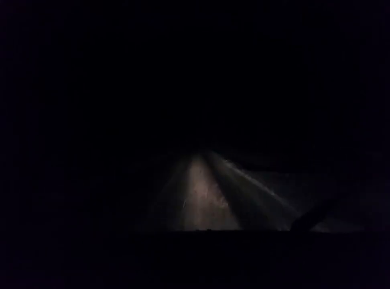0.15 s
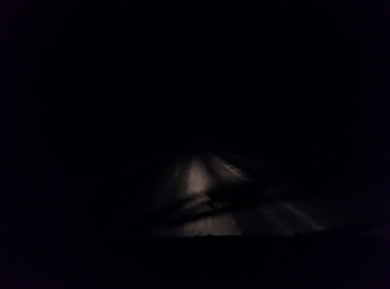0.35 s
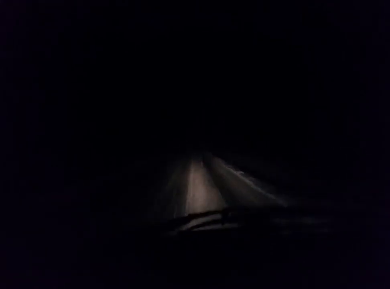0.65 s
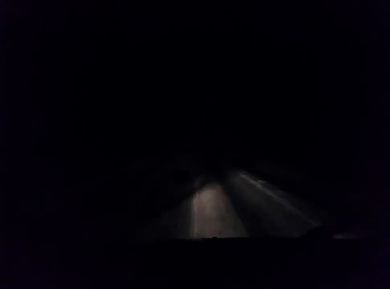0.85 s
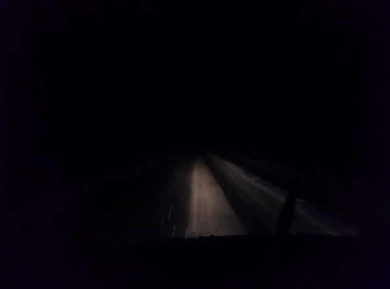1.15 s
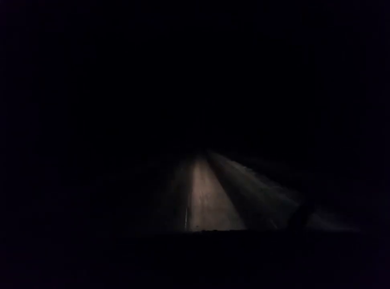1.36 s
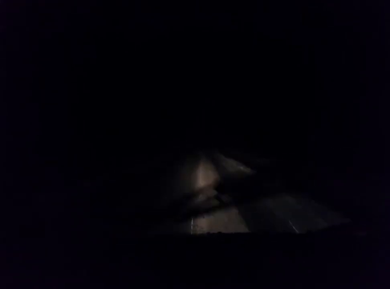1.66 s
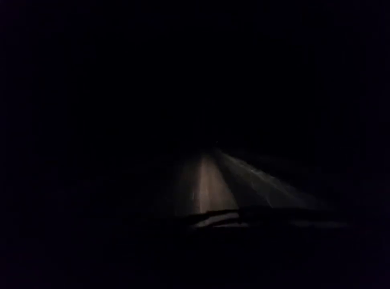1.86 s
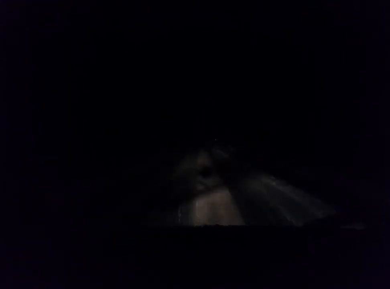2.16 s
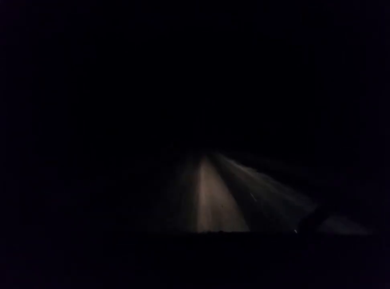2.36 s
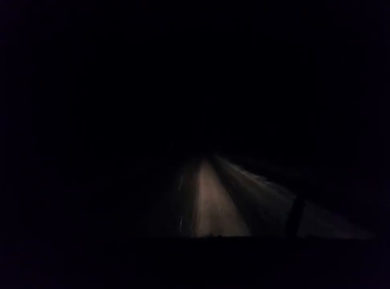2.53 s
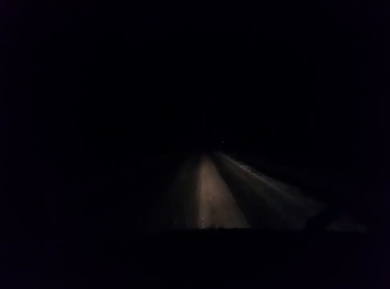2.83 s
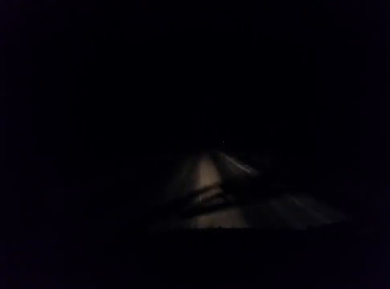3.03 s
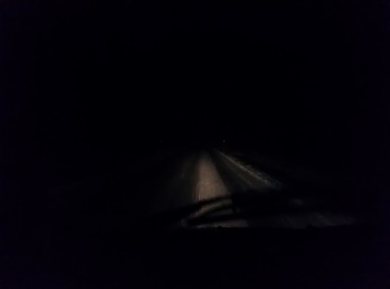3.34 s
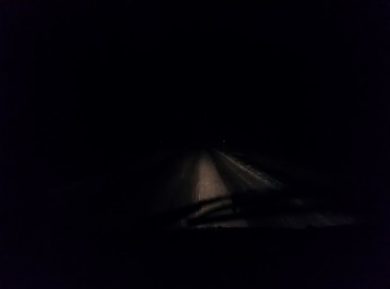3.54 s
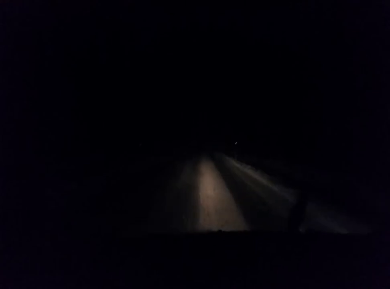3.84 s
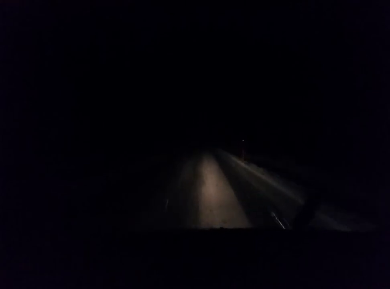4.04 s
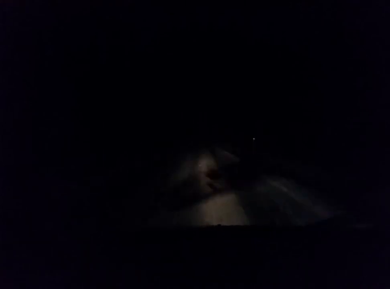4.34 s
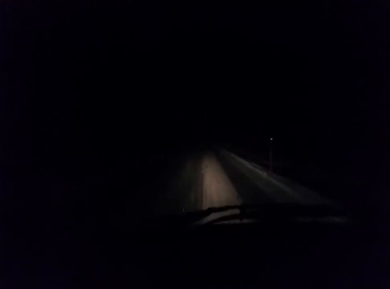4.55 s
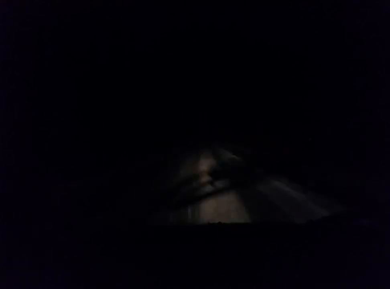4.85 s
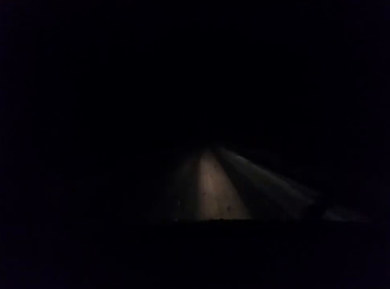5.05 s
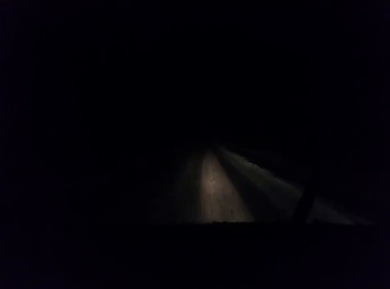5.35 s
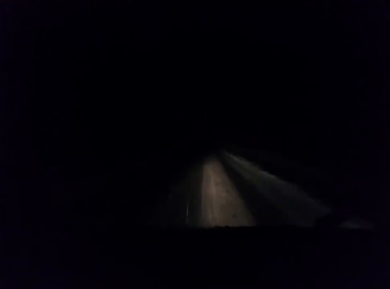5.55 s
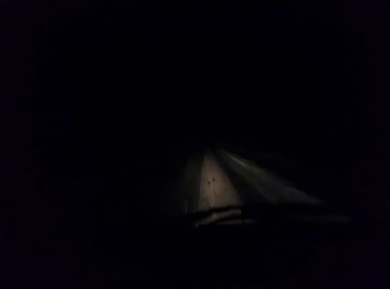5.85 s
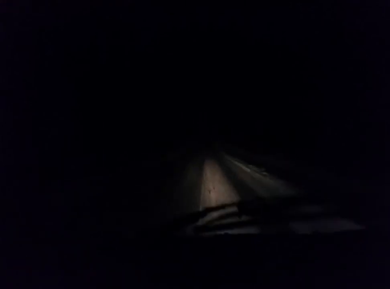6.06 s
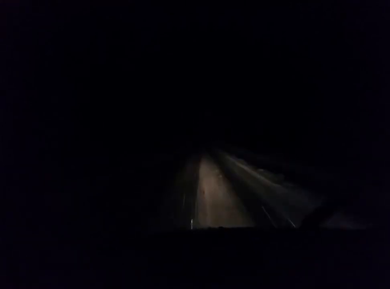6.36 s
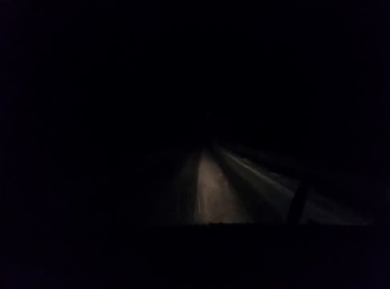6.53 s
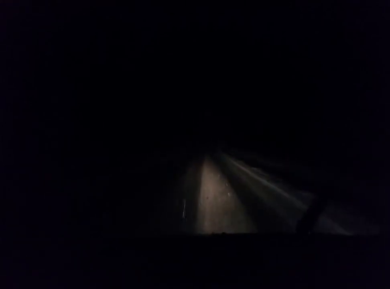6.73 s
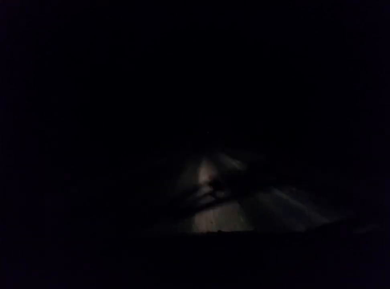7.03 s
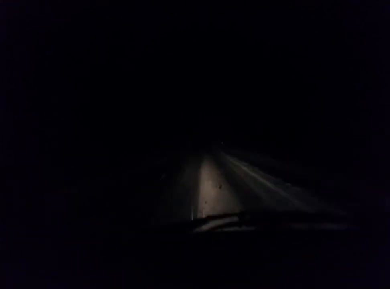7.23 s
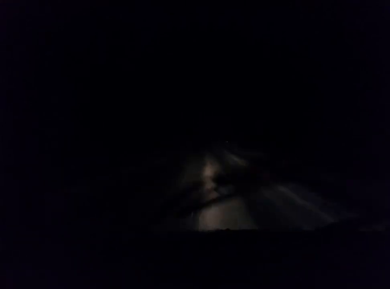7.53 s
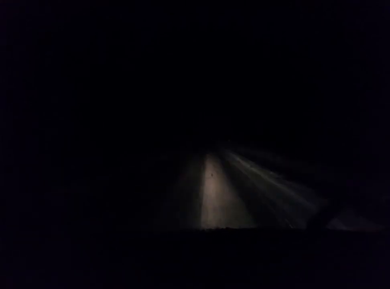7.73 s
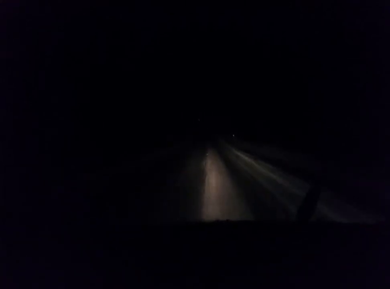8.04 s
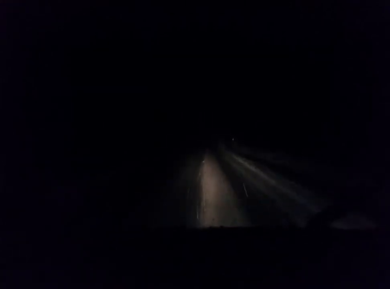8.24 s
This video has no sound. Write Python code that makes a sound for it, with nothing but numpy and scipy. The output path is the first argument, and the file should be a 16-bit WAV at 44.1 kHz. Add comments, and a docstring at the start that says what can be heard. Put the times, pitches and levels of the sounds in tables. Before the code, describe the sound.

Inside a moving car at night, heard close to the windscreen: a steady low engine hum, deep uneven body boom and muffled tyre roar on slush, with faint vent hiss. About every 1.35 seconds a wiper blade flips with a sharp snap and arm knock, usually followed by a short wet, juddering drag and low rubbery moan. An extra weaker flip comes near the end.

```python
"""Inside a car at steady speed on a slushy road, heard by a phone held near the windscreen.
From the start the engine hums (sines), the road booms and roars and the vents hiss (shaped noise).
About every 1.35 s, first at 0.04 s, a wiper blade flips: a snap, a knock of the arm, a wet tail.
After most flips it drags over the wet glass: uneven puffs of noise and single slips with spray.
Meanwhile glass and arm moan or squeak in wavering tones; a last extra flip comes near the end."""
import sys
import numpy as np
from scipy import signal
from scipy.fft import rfft, irfft, next_fast_len
from scipy.io import wavfile
from scipy.ndimage import uniform_filter1d

SR = 44100
rng = np.random.default_rng(int(sys.argv[2]) if len(sys.argv) > 2 else 0)


def to_wav(s):
    """Save 16-bit WAV."""
    ch = np.atleast_2d(s).T  # columns
    pcm = np.round(np.clip(ch, -1, 1) * 32767)  # PCM
    wavfile.write(sys.argv[1], SR, pcm.astype(np.int16))


N = 369999
T = np.arange(N) / SR  # time of every sample, s

# the blade drags over the glass: start t/s, length t/s, level/dB, level change to the end/dB,
# extra rumble/dB, extra brightness/dB
DRAGS = [(0.18, 0.35, -28.5, -1.5, 9.5, -1), (1.631, 0.14, -25.5, -10.5, -2, 0),
         (1.769, 0.12, -29, -2.5, 8.5, -5), (2.858, 0.15, -26.5, -9.5, 8.5, -12),
         (2.971, 0.18, -28, -6.5, 3.5, -7), (3.115, 0.18, -32, -8.5, 8.5, 2),
         (4.178, 0.19, -32.5, -2, 14, 3.5), (4.406, .15, -33.5, -1, -2, -7),
         (5.634, 0.1, -26.5, -10, -12, 3), (5.714, 0.24, -27, -8, 6, 3.5), (6.895, 0.22, -33, 5.5, 7.5, 0),
         (7.07, 0.21, -30, -1, 8.5, -1.5), (8.183, .3, -32.5, -3.5, 8, -2)]


def amp(db):
    """Turn dB into a gain."""
    return 10 ** (np.asarray(db) / 20)


def on_log(table, hz):
    """Read a table of f/Hz and value, with frequency on a log axis."""
    f, v = np.transpose(table)
    return np.interp(np.log(hz + 1), np.log(f), v)


def columns(table, outside=None):
    """Draw straight lines between table rows; give each column at every sample."""
    s, *cols = np.transpose(table)
    return [np.interp(T, s, c, outside, outside) for c in cols]


def walk(rate):
    """Wander at random: levels held 1 / rate s, smoothed twice; spread near 1."""
    k = int(SR / rate)
    held = np.repeat(rng.standard_normal(N // k + 1), k)
    return 1.247 * uniform_filter1d(uniform_filter1d(held, k), k)[:N]


def flicker(depth_db, rate, count):
    """Make unrelated level walks in dB, one for each band."""
    return [depth_db * walk(rate) for _ in range(count)]


def noise():
    """Make two unrelated white noises."""
    return rng.standard_normal((2, N))


def band(x, hz, width):
    """Ring like one resonance (two poles), with gain 1 at its centre."""
    return signal.lfilter(*signal.iirpeak(min(hz, .45 * SR), hz / width, SR), x)


def burst(s, t60):
    """Jump up at s and die away, losing 60 dB in t60 seconds."""
    out, first = np.zeros(N), int(s * SR)
    fading = T[:min(int(2 * t60 * SR), N - first)]
    out[first:first + len(fading)] = np.exp(-np.log(1000) * fading / t60)
    return out


def sweep(start, length):
    """Give the progress 0-1 through a drag and its envelope: grip, hold, let go."""
    grip_s, let_go_s = 0.032, 0.03
    rise = np.clip((T - start) / grip_s, 0, 1)
    fall = np.clip((start + length - T) / let_go_s, 0, 1)
    along = np.clip((T - start) / length, 0, 1)
    return along, np.sin(np.pi / 2 * rise * fall) ** 2


def cabin(source, shape, bands_db):
    """Colour two unrelated signals, spread them over both ports, move the gain of each band."""
    # how alike the ports sound: f/Hz, left-right correlation
    likeness = [(25, 0.999), (60, 0.96), (200, 0.97), (360, 0.64), (470, 0.88), (560, 0.79), (700, 0.8),
                (950, 0.3), (1600, -0.2), (2100, 0.5), (2700, 0.1), (3200, -0.05), (14000, .05)]
    # each port has its own treble resonance: f/Hz, left minus right level/dB
    port_lean = [(30, -1.5), (60, -.5), (170, 3), (400, -0.5), (800, 2.5), (1350, -2.5), (2100, 2.5),
                 (3800, 2), (4900, -2.5), (5500, -12.5), (6700, -18), (7800, 15.5), (9400, 17.5),
                 (11500, 0), (14000, -4.5)]
    size = next_fast_len(N)
    hz = np.arange(size // 2 + 1) * SR / size
    alike = np.clip(on_log(likeness, hz), -1, 1)
    mid, side = rfft(source, size) * [np.sqrt(1 + alike), np.sqrt(1 - alike)]
    lean = amp(on_log(port_lean, hz) / 2)
    # leaning moves sound between the ports and keeps their mean
    mean = np.sqrt(lean ** 2 + lean ** -2 + 2 * alike)
    ports = np.array([(mid + side) * lean, (mid - side) / lean])
    both = amp(on_log(shape, hz)) * ports / mean
    # bring the average of the ports to RMS 1 before the band gains
    both = both / np.sqrt(np.mean(irfft(both.mean(axis=0), size) ** 2))
    # bands overlap evenly on the log axis; the last falls to half at the top
    low, high = shape[0][0], shape[-1][0]
    place = np.clip(np.log((hz + 1) / low) / np.log(high / low), 0, 1) * (len(bands_db) - 0.5)
    out = 0
    for k, db in enumerate(bands_db):
        share = np.clip(1 - abs(place - k), 0, 1)
        out = out + amp(db) * irfft(both * share, size)[:, :N]
    return out


def engine():
    """The steady firing rate and its multiples hum through the mounts, each wavering a little."""
    # engine orders: multiple of the firing rate, level/dB added to the hum level
    orders = [(1, 1), (2, -9.5), (3, -19)]
    # hum before the order levels: t/s, level/dB
    hum_level = [(0, -14.5), (1.7, -17.5), (3.2, -18.5), (3.8, -15.5), (4.6, -21), (5.3, -20.5), (6, -19.5),
                 (7.3, -19), (8.39, -15)]
    firing_hz, rev_wander = 61.27, 0.0015  # wander is a share of the rate
    phase = 2 * np.pi * np.cumsum(firing_hz * (1 + rev_wander * walk(2.02))) / SR
    hum = 0
    for k, db in orders:
        hum = hum + amp(db + 1.6 * walk(18)) * np.sin(k * phase + 2 * np.pi * rng.random())
    return np.sqrt(2) * amp(columns(hum_level)[0]) * hum


def road():
    """Uneven slush shakes floor and body shell and roars under the tyres; the tread drones."""
    # road surface: t/s, boom of the shell level/dB, roar of the tyres level/dB,
    # shudder of the floor level/dB
    surface = [(0, -12.5, -23.5, -23), (1, -14.5, -26, -17), (1.7, -14, -24.5, -17.5), (2.2, -15, -26, -14),
               (2.9, -13, -25, -14), (3.7, -17.5, -28, -17.5), (4.1, -14, -26.5, -12.5),
               (5.2, -16, -27, -13), (6.1, -15.5, -27, -16.5), (6.9, -13, -26, -12), (7.6, -17, -27, -15.5),
               (8.39, -13.5, -25, -10.5)]
    # colour of the boom in the shell: f/Hz, relative level per Hz/dB
    boom_shape = [(60, -39.5), (92, -5.5), (108, -8.5), (122, 1), (143, -0.5), (160, -3.5), (176, -6),
                  (197, -5), (212, -9), (232, -22), (245, -11.5), (266, -19.5), (310, -17.5), (750, -120)]
    # colour of the shaking floor: f/Hz, relative level per Hz/dB
    shudder_shape = [(12, -60), (22, -13), (30, -5), (42, 0), (52, 2), (64, 1), (74, .5), (88, -5),
                     (110, -30), (250, -130)]
    # colour of the tyres in the slush: f/Hz, relative level per Hz/dB
    roar_shape = [(180, -23.5), (240, -1), (330, -5), (480, -7), (570, -11), (670, -10.5), (820, -13),
                  (950, -22), (1075, -24), (1220, -22.5), (1350, -20.5), (1480, -23), (1620, -29.5),
                  (1740, -28), (1900, -30.5), (2020, -25.5), (2170, -26), (2270, -31.5), (2480, -31),
                  (3050, -38), (3700, -42.5), (5000, -45), (7200, -53)]
    wiping_boom_db = 0.5  # the working wiper lifts the boom of the shell
    drone_hz, drone_wander, drone_db = 142, .035, -11  # level relative to the boom curve
    boom_db, roar_db, shudder_db = columns(surface)
    wiping = sum(sweep(start, length)[1] for start, length, *_ in DRAGS)
    boom_gain = amp(boom_db + wiping_boom_db * wiping + 0.52 * walk(13.0))
    boom = boom_gain * cabin(noise(), boom_shape, flicker(0.39, 7.4, count=3))
    shudder = amp(shudder_db) * cabin(noise(), shudder_shape, [0])
    tread = np.sin(2 * np.pi * drone_hz * np.cumsum(1 + drone_wander * walk(3.)) / SR)
    drone = np.sqrt(2) * amp(boom_db + drone_db + 4.4 * walk(6.)) * tread
    roar = amp(roar_db) * cabin(noise(), roar_shape, flicker(1.5, 10., count=7))
    return boom + drone + shudder + roar


def vents():
    """Air hisses smoothly in the vents, patchy in time."""
    # vent air: t/s, level/dB
    air = [(0, -47.5), (1, -49.5), (1.5, -48.5), (2.5, -48), (3.7, -52), (4.1, -48.5), (5.1, -52),
           (5.7, -49.5), (6.3, -52), (6.7, -50), (7.8, -51.5), (8.39, -50)]
    # colour of the hiss: f/Hz, relative level per Hz/dB
    hiss_shape = [(6500, -49), (7300, -55), (8200, -10), (9500, -1), (10700, -5), (12000, -5),
                  (13200, -8.5), (14200, -34.5), (14600, -9.5)]
    level_db = columns(air)[0] + 1.5 * walk(6.0)
    return amp(level_db) * cabin(noise(), hiss_shape, flicker(0.85, 7.1, count=3))


def wiper_flips():
    """The blade edge snaps over; the arm knocks just after and rattles; a short wet tail follows."""
    # flips: t/s, snap impulse level before filtering/dB, knock impulse level before filtering/dB,
    # left minus right level of the snap/dB, centre of the snap f/Hz
    flips = [(0.043, -9, -20, 6, 12500), (1.448, -14, -23, 9, 10000), (2.7645, -4, -10, 12, 12500),
             (4.0794, -10, -13.5, 3.0, 11500), (5.452, -14, -9.5, 8, 9500), (6.7678, -4, -11, 7, 12000),
             (8.1429, -4, -10, 6, 12500), (8.2315, -16, -15, 9, 9000)]
    # resonances of the wiper arm: f/Hz, width f/Hz, level/dB
    arm_modes = [(2650, 700, 8), (3600, 800, 2), (4450, 350, 5), (5300, 1000, 0), (6600, 1200, -8)]
    first_touch_db = -3  # the snap itself already jolts the arm; relative to the knock
    knock_lag_s, rattle_db, rattle_t60_s = .003, -20.5, .085  # rattle relative to the knock
    wet_db, wet_t60_s = -18.5, .065  # wet tail relative to the snap
    clicks, shake, wet = np.zeros((2, N)), np.zeros((2, N)), np.zeros(N)
    white = noise()
    tail = band(band(noise(), 10200, 3100.0), 9200, 3500.0)
    for s, snap_db, knock_db, pan_db, snap_hz in flips:
        click = band(np.arange(N) == int(s * SR), snap_hz, snap_hz * 0.8)
        clicks += amp(snap_db + np.array([[pan_db], [-pan_db]]) / 2) * click
        shake[:, int(s * SR)] += amp(knock_db + first_touch_db)
        shake[:, int((s + knock_lag_s) * SR)] += amp(knock_db)
        shake += amp(knock_db + rattle_db) * burst(s, rattle_t60_s) * white
        wet += amp(snap_db + wet_db) * burst(s, wet_t60_s)
    snap = signal.sosfilt(signal.butter(6, 8200., "high", fs=SR, output="sos"), clicks)
    arm = 0
    for k, (hz, width, db) in enumerate(arm_modes):
        arm = arm + (-1) ** k * amp(db) * band(shake, hz, width)  # neighbours in opposite sign
    return snap + wet * tail + arm


def wiper_drag():
    """Stick-slip: the rubber lets go in dense uneven steps, each a short puff of noise into the glass."""
    # single slips of the rubber: t/s, level before the glass filter/dB
    slip_list = [(.199, -24), (0.2374, -22), (.35, -21), (.375, -18), (.41, -22), (.46, -21), (.49, -22),
                 (.527, -21), (1.6594, -21), (1.7365, -20), (1.7963, -18), (1.8442, -19), (1.887, -22),
                 (2.89, -20), (3.055, -21), (3.155, -25), (4.2318, -18), (4.445, -21), (4.48, -22),
                 (5.657, -17), (5.7274, -20), (5.7694, -18), (5.8114, -21), (5.8541, -18), (7.0786, -14),
                 (8.236, -19)]
    # colour of the dragging blade: f/Hz, relative level per Hz/dB
    swish_shape = [(150, -36), (260, 1.5), (380, -15.5), (650, -4.5), (1100, -14), (1500, -18), (2050, -26),
                   (2800, -23), (3250, -33.5), (3700, -38.5), (5500, -43.5), (7200, -53), (9500, -44),
                   (12000, -62)]
    # colour of the thrown water: f/Hz, relative level per Hz/dB
    spray_shape = [(3000, -30), (4000, -2), (5500, -4), (7200, -22), (8500, -4), (10000, 0), (12500, -4),
                   (14500, -20)]
    arch_db, rumble_fade_db = 3.5, -3.5  # louder in mid-sweep; rumble thins from start to end
    slip_t60_s, slip_tick_db = .09, 15  # the tick that opens a slip, relative to it
    spray_db, spray_t60_s = -27, .2  # each slip throws off a little water; relative to the slip
    glass_top_hz = 3600
    drag, rumble, bright = np.zeros((3, N))
    flutter_db = 1.5 * walk(22.)
    for start, length, db, change_db, rumble_db, bright_db in DRAGS:
        along, hold = sweep(start, length)
        drag += hold * amp(flutter_db + db + change_db * along + arch_db * np.sin(np.pi * along))
        rumble += (hold > 0) * (rumble_db + rumble_fade_db * (along - .5))
        bright += (hold > 0) * bright_db
    # about 350 steps a second at random, each fading with a time constant of 3 ms
    steps = (rng.random(N) < 350 / SR) * amp(1.5 * rng.exponential(size=N))
    judder = 3 + signal.lfilter([1], [1, -np.exp(-1 / (.003 * SR))], steps)
    smear = drag * cabin(noise() * judder, swish_shape, [rumble, 0, bright])
    slips, ticks, spray_gain = np.zeros((3, N))
    for s, db in slip_list:
        slips += amp(db) * burst(s, slip_t60_s)
        ticks[int(s * SR)] = amp(db + slip_tick_db)
        spray_gain += amp(db + spray_db) * burst(s, spray_t60_s)
    slips = uniform_filter1d(slips, size=40)  # soften the edges
    # the glass passes the slips in a band with steep sides
    glass = band(band(band(slips * noise() + ticks, 2250, 1400.0), 2000, 1900.0), 2000, 3400.0)
    glass = signal.sosfilt(signal.butter(3, glass_top_hz, fs=SR, output="sos"), glass)
    spray = spray_gain * cabin(noise(), spray_shape, [0])
    return smear + spray + glass


def wiper_moans():
    """The judder locks for a moment onto a mode of glass and arm; the pitch wavers."""
    # moans and squeaks: middle t/s, length t/s, f/Hz, level before the port gain/dB
    moans = [(.23, .09, 690, -31), (.38, .25, 124, -16), (.5, .07, 640, -32), (1.63, .2, 185, -20),
             (1.82, .1, 240, -24), (3., .6, 197, -21), (2.91, .09, 700, -28), (2.95, .4, 134, -13),
             (3.05, .1, 1120, -34), (3.06, .1, 1330, -35), (4.25, .15, 135, -16), (5.71, .27, 198, -13),
             (6.95, .15, 135, -16), (7.12, .15, 240, -24), (8.3, .2, 130, -13)]
    octave_db, octave_under_hz = -13, 160  # the deepest moans carry a second harmonic
    out = np.zeros(N)
    for mid, length, hz, db in moans:
        swell = np.cos(np.pi * np.clip((T - mid) / length, -.5, .5)) ** 2
        phase = 2 * np.pi * hz * np.cumsum(1 + 0.0101 * walk(25.)) / SR
        octave = (hz < octave_under_hz) * amp(octave_db) * np.sin(2 * phase)
        out += amp(db + 1.0 * walk(33.0)) * swell * (np.sin(phase) + octave)
    return np.sqrt(2) * out * amp(np.array([[.9], [-.9]]))  # left a little louder


def scene():
    """Add up everything heard in the cabin."""
    return engine() + road() + vents() + wiper_flips() + wiper_drag() + wiper_moans()


def record(dry):
    """The phone hears the left port slightly late, rounds the loudest peaks and cuts the top."""
    port_lag_s, top_hz = .0001, 14600
    left = np.pad(dry[0], (round(port_lag_s * SR), 0), "edge")[:N]
    rounded = 1.06 * np.tanh(np.array([left, dry[1]]))
    return signal.sosfilt(signal.ellip(10, .2, 80, top_hz, fs=SR, output="sos"), rounded)


dry = scene()
out = record(dry)
to_wav(out)
```